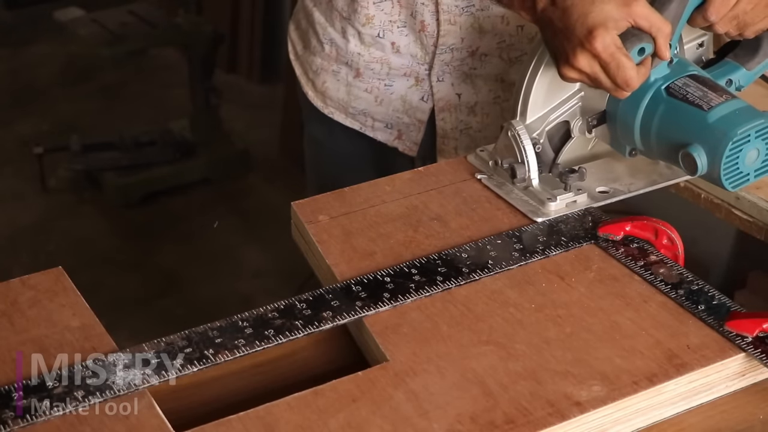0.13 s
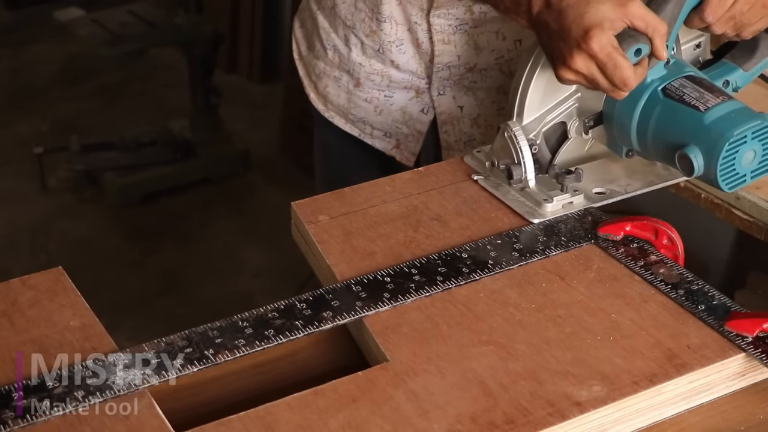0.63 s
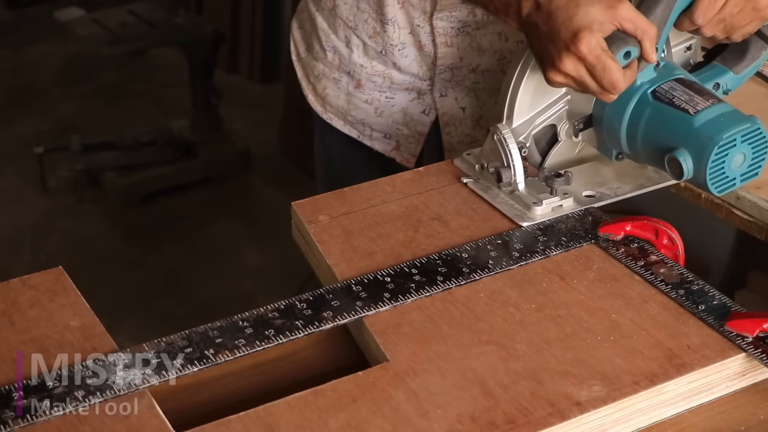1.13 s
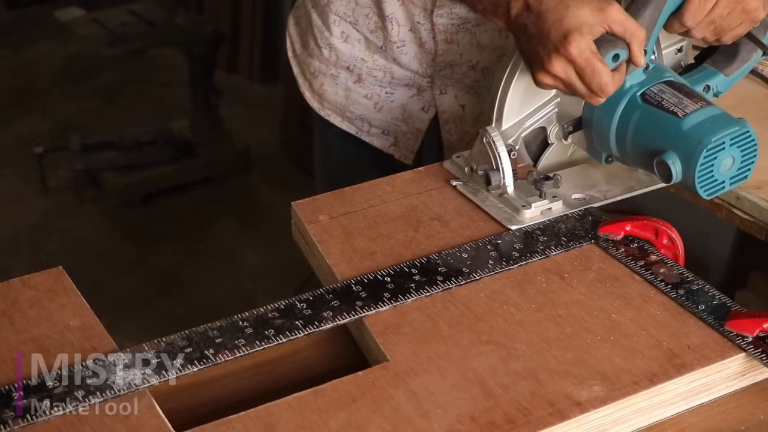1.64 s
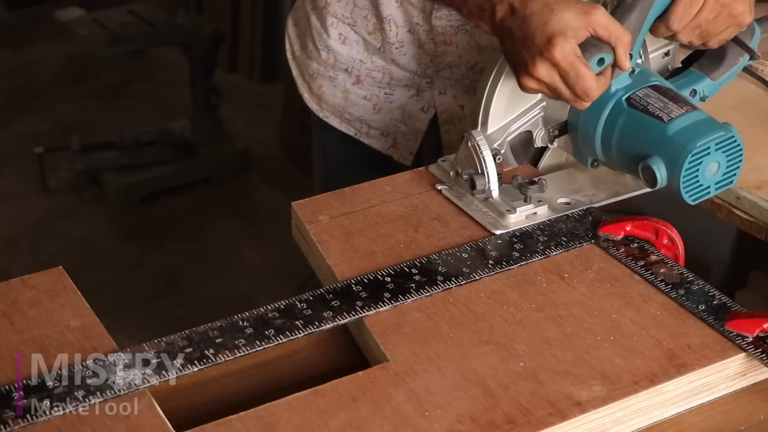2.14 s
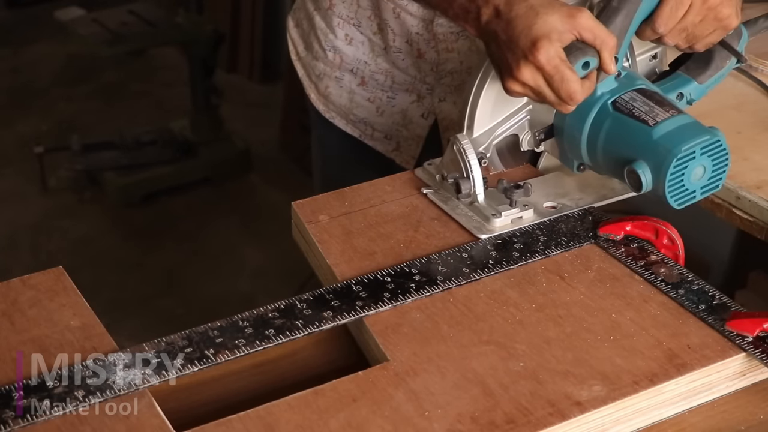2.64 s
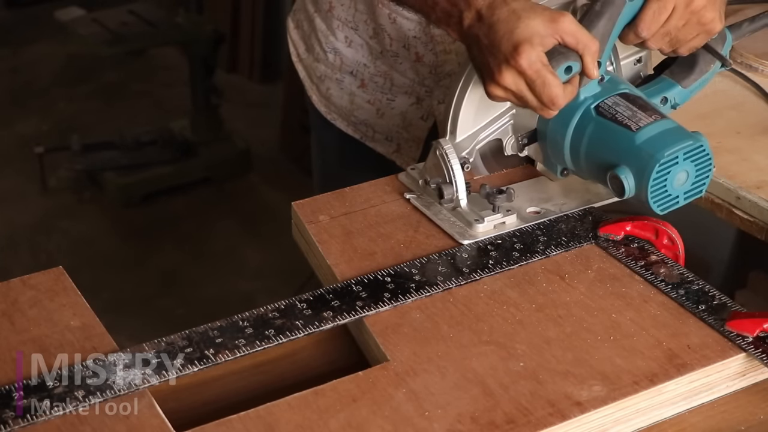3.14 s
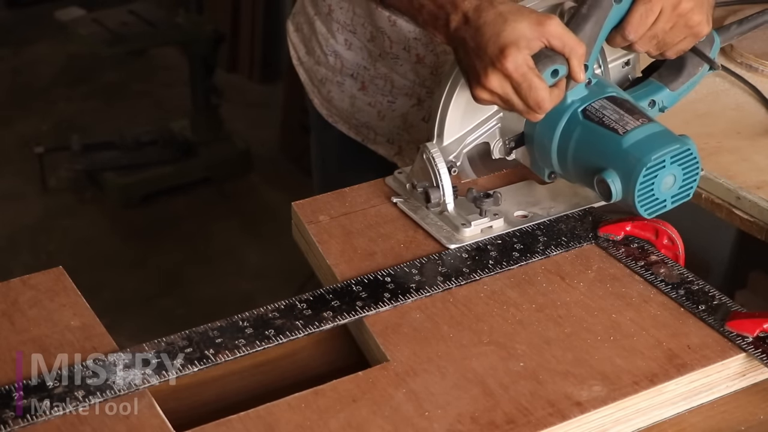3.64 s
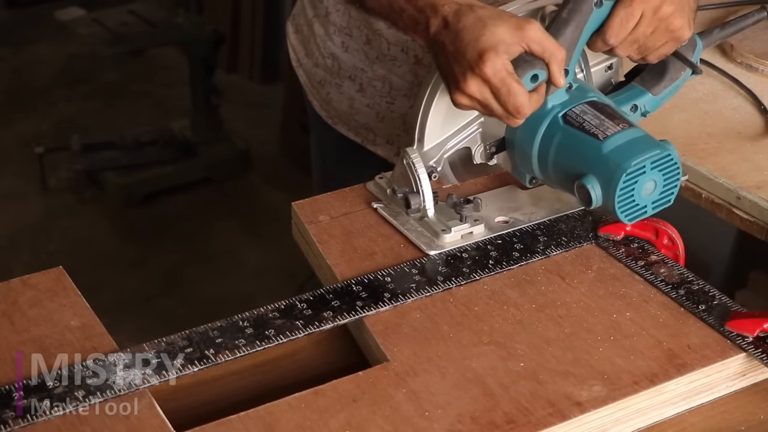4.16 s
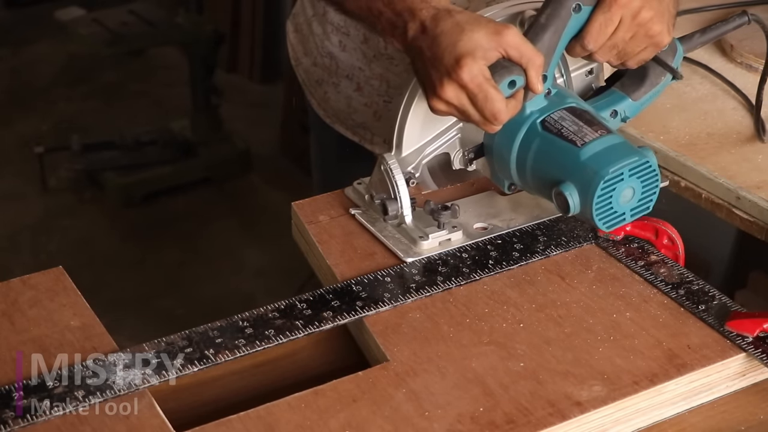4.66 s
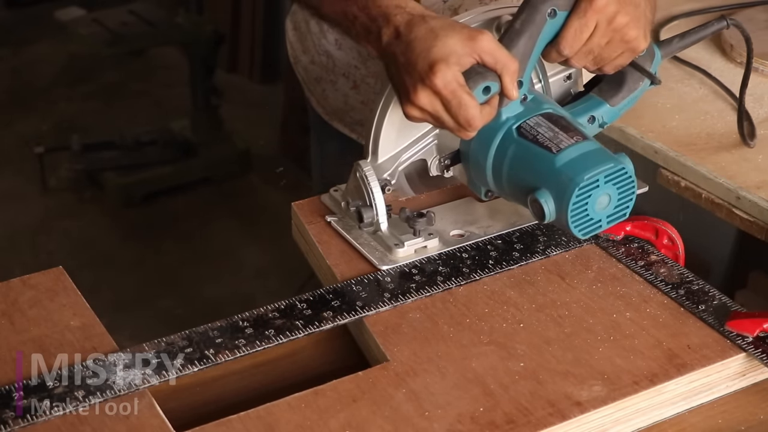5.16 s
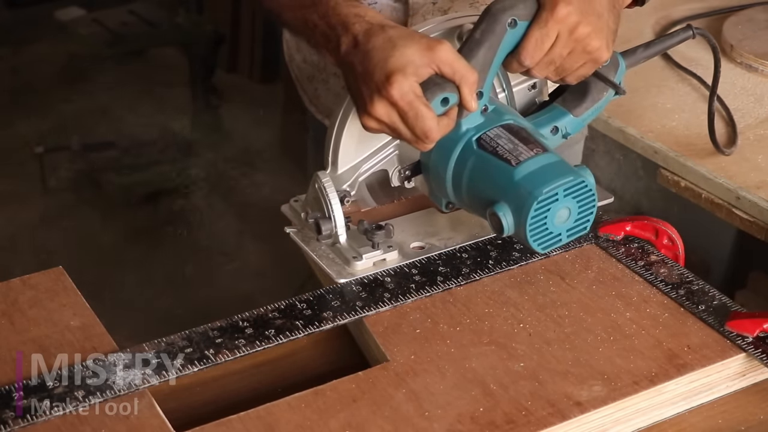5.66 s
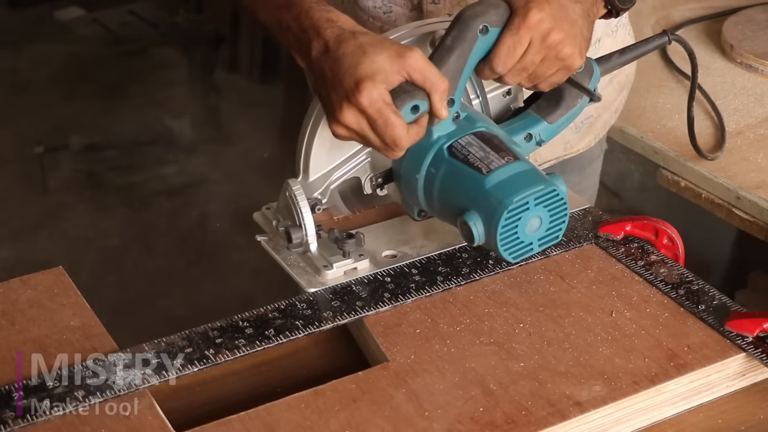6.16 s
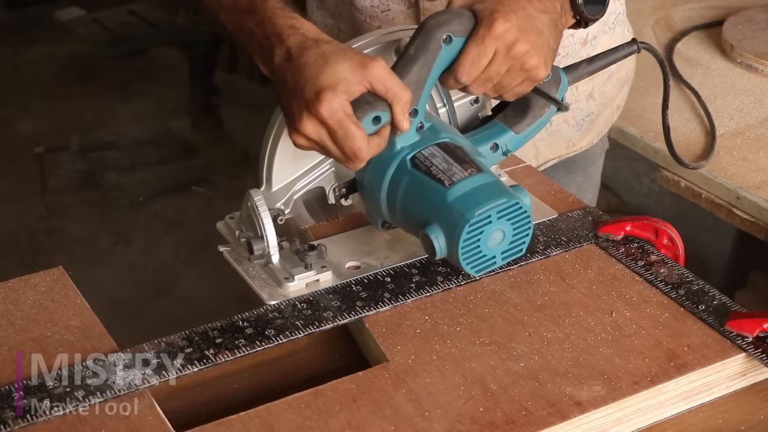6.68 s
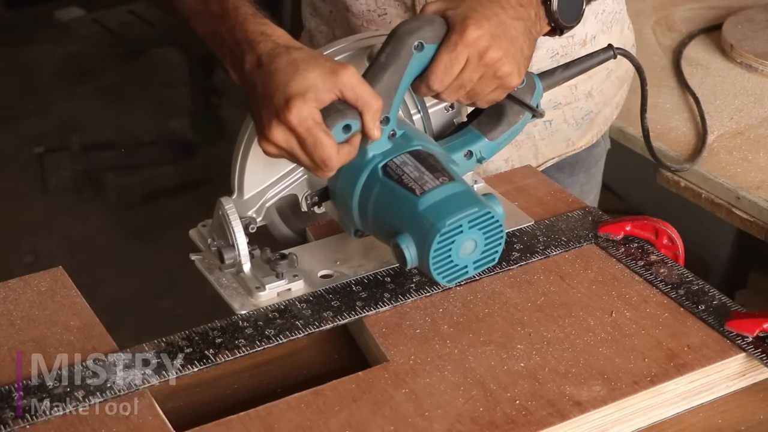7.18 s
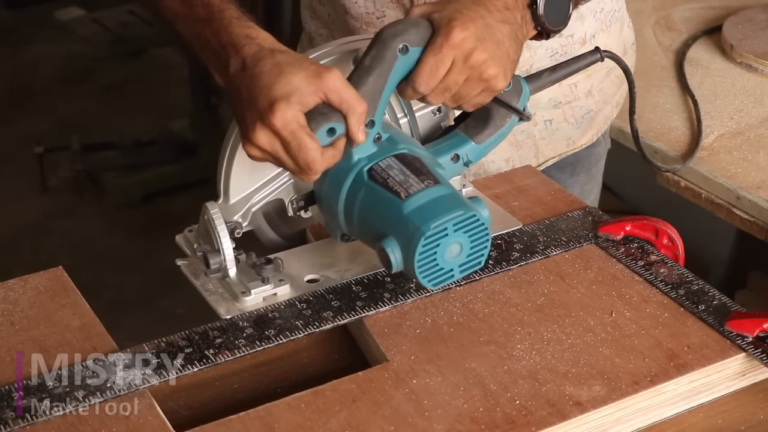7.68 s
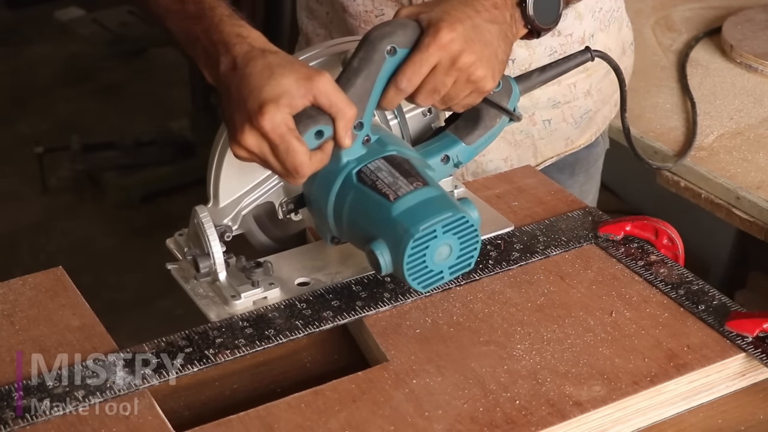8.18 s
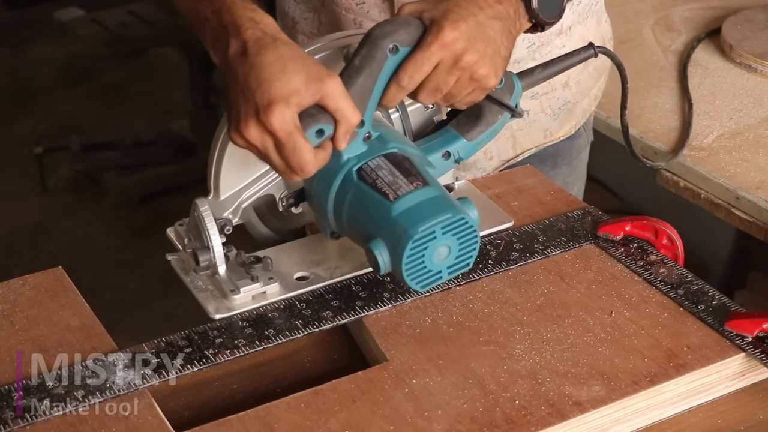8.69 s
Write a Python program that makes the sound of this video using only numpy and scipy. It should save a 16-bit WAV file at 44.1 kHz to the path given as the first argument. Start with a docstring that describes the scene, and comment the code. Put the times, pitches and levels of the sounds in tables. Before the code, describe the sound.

Close stereo microphone in a workshop: a power saw jumps to full speed with piercing motor whine and airy blade hiss, judders as it enters plywood, then cuts with a dense rasping roar, sagging in pitch under load. A rough screech flutters late in the cut. A crack and knocks mark the breakout, followed by freer spinning and a falling, ringing whine as power is released.

```python
"""Circular saw through plywood

In a workshop a hand-held saw spins up, cuts across a plywood sheet, breaks out at the far edge and coasts down.
Sines and narrow noise bands geared to the armature make its whine, shaft and tooth tones; shaped noise makes
the hiss of the blade and the rumble of sheet and guard; fluttering bands make the rubbing, decaying modes the
knocks. Another machine hums behind. Two close microphone ports hear it all, with the saw on the right."""
import sys
import numpy as np
from scipy import signal
from scipy.fft import rfft, irfft, next_fast_len
from scipy.io import wavfile
from scipy.ndimage import uniform_filter1d, map_coordinates

SR = 44100
rng = np.random.default_rng(int(sys.argv[2]) if len(sys.argv) > 2 else 0)


def generate_wav(signal):
    """Clip the signal to [-1, 1] and save it as 16-bit WAV at the path in sys.argv[1]."""
    frames = np.transpose(np.atleast_2d(signal))
    scaled = np.clip(frames, -1, 1) * 32767
    pcm = np.round(scaled).astype(np.int16)
    wavfile.write(sys.argv[1], SR, pcm)


def volts(x):
    """Linear amplitude factor 10**(x/20) for a level x in dB, scalar or array-like."""
    e = np.asarray(x, float) / 20
    return 10 ** e


N = 388521
TIME = np.arange(N) / SR  # s


def unit(x):
    """Scale to rms 1."""
    return x / np.sqrt(np.mean(x ** 2) + 1e-20)


def along(points, hz):
    """Read (Hz, value) points on a log frequency axis."""
    f, v = np.transpose(points)
    return np.interp(np.log(hz + 1), np.log(f + 1), v)


def curves(rows):
    """One value per sample for each column after the time."""
    s, *cols = np.transpose(rows)
    return [np.interp(TIME, s, c) for c in cols]


def wobble(rate):
    """A smooth random curve, rate knots a second."""
    return map_coordinates(rng.standard_normal(int(N * rate / SR) + 4), [TIME * rate])


def bump(s, length_s):
    """A smooth swell of height 1 around s."""
    return np.exp(-(2 * (TIME - s) / length_s) ** 2)


def filtered(x, response):
    """x times a response of frequency."""
    m = next_fast_len(N + 8192)
    return irfft(rfft(x, m) * response(np.fft.rfftfreq(m, 1 / SR)), m)[..., :N]


def phase(hz):
    """Running phase of a changing frequency."""
    return 2 * np.pi * np.cumsum(hz) / SR


def ports(alike):
    """Noise at the two microphone ports, its likeness following frequency."""
    turn = lambda hz: np.arccos(np.clip(alike(hz), -1, 1)) / 2
    weights = lambda hz: np.array([np.cos(turn(hz)), np.sin(turn(hz))])
    mid, side = filtered(rng.standard_normal((2, N)), weights)
    return np.array([mid + side, mid - side])


def band(hz, width_hz, alike):
    """Stereo narrow noise of rms 1 whose centre follows hz."""
    soft = lambda f: 1 / (1 + (2 * f / width_hz) ** 2)
    a, b = (filtered(ports(lambda f: alike + 0 * f), soft) for _ in "ab")
    return unit(a * np.cos(phase(hz)) + b * np.sin(phase(hz)))


def tones(turns, orders, waver_db, apart):
    """Sines on multiples of a phase; each wavers alone and reaches the two ports a little out of step."""
    out = 0
    for k, db in orders:
        level = np.sqrt(2) * volts(db + waver_db * wobble(7))
        offset = rng.uniform(0, 2 * np.pi) + apart * k * np.array([[1], [-1]])
        out = out + level * np.sin(k * turns + offset)
    return out


def lift(hz, modes):
    """Gain of resonances (Hz, width Hz, dB) standing on a flat response."""
    return np.sqrt(1 + sum(volts(2 * db) / (1 + (2 * (hz - c) / w) ** 2) for c, w, db in modes))


# Six stages: running free, cut begun, mid cut, late cut, out of the wood, coasting.
# Where one stage gives way to the next, in seconds.
STAGE_CHANGES = [1.7, 4.2, 5.35, 7.4, 8.43]
# How long each change takes, in seconds.
STAGE_CHANGE_LENGTHS = [0.27, 0.6, 0.076, 0.06, 0.45]


def stages(changes=STAGE_CHANGES):
    """The share of each stage over time, by linear crossfades."""
    passed = [np.clip((TIME - s) / w + .5, 0, 1) for s, w in zip(changes, STAGE_CHANGE_LENGTHS)]
    return -np.diff([np.ones(N), *passed, np.zeros(N)], axis=0)


# How loud the blade is, hand pushes aside. Each row: time in seconds, level in dB before small trims.
EFFORT = [(0, -23.5), (.25, -25), (.6, -26.5), (1.4, -29), (2.05, -33), (2.55, -34), (2.7, -35.5),
          (3.15, -35.5), (3.45, -33.5), (4.0, -33), (4.48, -37.5), (5.28, -34.5), (5.38, -38), (5.85, -36),
          (5.95, -38), (6.95, -37.5), (7.37, -37), (7.5, -31.5), (8.33, -32), (8.42, -31), (8.6, -30),
          (8.8, -33)]


def effort():
    """The blade's level in dB, to which the other parts are referred."""
    return curves(EFFORT)[0]


# The hand pushes the saw on or eases off; the brief swell at 7.74 s is a knock. Each row: middle in seconds,
# length in seconds, change in dB.
PUSHES = [(1.125, 0.14, 1), (1.823, 0.068, 1.5), (2.176, 0.057, 0.5), (2.443, 0.28, 1.5), (3.4, 0.067, 1.5),
          (3.772, 0.15, 1.5), (4.248, 0.055, 1.5), (4.69, 0.16, 2), (5.082, 0.18, 3), (5.938, 0.044, -2.5),
          (6.124, 0.13, 3), (6.464, 0.16, 0.5), (6.787, 0.11, 1.5), (6.935, 0.06, -2), (7.01, 0.097, 3),
          (7.123, 0.16, 4.5), (7.296, 0.14, 3), (7.544, 0.32, 2.5), (7.74, 0.027, 3.5), (7.887, 0.05, 3.5),
          (8.026, 0.17, 2.5), (8.186, 0.071, 3.5), (8.426, 0.18, 3)]


def pushes():
    """The hand's uneven pressure in dB, with one brief knock, as a sum of swells."""
    return sum(db * bump(s, length_s) for s, length_s, db in PUSHES)


FREE_HZ, START_GAP_HZ, SPIN_UP_S = 268, 54, .205  # unloaded turns per s, shortfall at start, time constant
OFF_S, COAST_S = 8.115, 1.09  # trigger released, time constant of the run-down
SLOW_HZ, SLOWEST_HZ = 233, 164  # coasting from one speed to the other the tones come forward
# The wood slows the armature. Each row: time in seconds, speed lost in turns per second.
LOAD = [(1.0, 0), (1.7, 4), (2.75, 20.5), (3.0, 22), (4.0, 20.5), (4.25, 23.5), (5.0, 25), (5.25, 30),
        (5.5, 42), (6.0, 37), (6.25, 42), (6.75, 39), (6.94, 33), (7.05, 22), (7.25, 15), (7.5, 7.5),
        (8.1, 4.5)]


def armature():
    """Wood load, turns per second and how far the coasting has gone (0 to 1); speed decays once power is off."""
    load, = curves(LOAD)
    driven = FREE_HZ - START_GAP_HZ * np.exp(-TIME / SPIN_UP_S) - load
    speed = driven * np.exp(-np.maximum(TIME - OFF_S, 0) / COAST_S)
    slowed = np.clip((SLOW_HZ - speed) / (SLOW_HZ - SLOWEST_HZ), 0, 1) * (TIME > OFF_S)
    return load, speed, slowed


CHOKE_HZ = 28  # loads over this, in turns per s lost, pack the gullets


def choke(load):
    """How far the load packs the gullets, in turns per second beyond the limit."""
    return np.maximum(load - CHOKE_HZ, 0)


WHINE_FOLLOWS, WHINE_DRIFT_DB, WHINE_RISE_DB = 0.94, 5, 19  # share of hand pushes, random fade, coasting rise
NO_ARC_DB = -2  # without current the brushes stop arcing
HOUSING_RING_HZ, HOUSING_RING_DB = 6200, -6  # the housing goes on ringing under the slow whine
# Whine against the blade in each of the six stages, in dB before trims.
WHINE_DB = [-8.5, -10, -10.5, -9.5, -20, -15]
# Clean commutator lines in the whine. Each row: order of the armature, relative level in dB.
COMMUTATOR_LINES = [(37, -19), (38, -15), (39, -14), (40, -18)]
# The motor housing rings as the whine sweeps past. Each row: centre in Hz, width in Hz, lift in dB.
HOUSING_MODES = [(6230, 200, 5)]


def commutator_whine(turns, speed, slowed):
    """Brush arcing smears most of the whine into bands geared to the armature, with clean lines inside."""
    level_db = effort() + WHINE_DB @ stages() + NO_ARC_DB * np.clip((TIME - OFF_S) / .05, 0, 1)
    level_db = level_db + WHINE_RISE_DB * slowed + WHINE_FOLLOWS * pushes() + WHINE_DRIFT_DB * wobble(5)
    # two upper bands come into range as the motor slows
    upper = band(77 * speed, 700, alike=.3) + volts(-3) * band(89 * speed, 700, alike=.3)
    upper = volts(np.interp(speed, [140, 158, 178], [-3, -11, -32])) * upper
    whine = band(38.2 * speed, 580, alike=.35) + upper + tones(turns, COMMUTATOR_LINES, 5, .015)
    ringing = volts(HOUSING_RING_DB) * band(HOUSING_RING_HZ + 0 * speed, 260, alike=.35)
    whine = volts(-1.5 * slowed) * whine + slowed ** 2 * ringing
    whine = volts(level_db + 2.5 + 1.3 * wobble(25)) * whine
    return filtered(whine, lambda hz: lift(hz, HOUSING_MODES))


SHAFT_FREE_S = 6.8  # the shaft tones fade once the sheet hangs loose
ENTRY_S, ENTRY_LENGTH_S, JUDDER_DB = 1.8, .55, 8  # upper shaft tones swell as the blade enters the wood
SHAFT_CHOKE_DB, SHAFT_RISE_DB = -.7, 3.5  # loss per turn per s of choking, rise on coasting
# Lower shaft tones. Each row: order of the armature, relative level in dB.
SHAFT_LOW = [(1, -5), (3, -1)]
# Upper shaft tones. Each row: order of the armature, relative level in dB.
SHAFT_HIGH = [(4, -6), (5, -1), (6, -9), (7, -10)]
# Lower shaft tones against the blade in each of the six stages, in dB before a trim.
SHAFT_LOW_DB = [-58, -48, -42, -34, -48, -50]
# Upper shaft tones against the blade in each of the six stages, in dB before a trim.
SHAFT_HIGH_DB = [-52, -33, -28, -28, -40, -46]


def shaft_tones(turns, load, slowed):
    """Whole orders of the armature as sines, the upper ones weakened by packed gullets."""
    shares = stages([*STAGE_CHANGES[:3], SHAFT_FREE_S, STAGE_CHANGES[4]])
    low_db = effort() + SHAFT_LOW_DB @ shares
    high_db = effort() + SHAFT_HIGH_DB @ shares + JUDDER_DB * bump(ENTRY_S, ENTRY_LENGTH_S)
    high_db = high_db + SHAFT_CHOKE_DB * choke(load) + SHAFT_RISE_DB * slowed
    low = volts(low_db + 1.5) * tones(turns, SHAFT_LOW, 2, .02)
    high = volts(high_db + 1.5) * tones(turns, SHAFT_HIGH, 3.5, .02)
    return low + high


TEETH_PER_TURN = 5.425  # tooth passages per turn of the armature
TOOTH_CHOKE_DB = -1.4  # loss per turn per s of choking
# Harmonics of the tooth tone. Each row: multiple, level in dB relative to the fundamental.
TOOTH_HARMONICS = [(2, -5), (3, -11), (4, -10), (5, -9), (6, -9)]
# The tooth tone against the blade. Each row: time in seconds, level in dB before a trim.
TOOTH_DB = [(0, -40), (.25, -32), (.5, -33), (.65, -42), (3.2, -40), (3.4, -54), (4.05, -54), (4.2, -37),
            (5.15, -36), (5.3, -38), (6.95, -38), (7.05, -31), (7.4, -34), (8.1, -38), (8.14, -29),
            (8.21, -23), (8.275, -44), (8.33, -23), (8.46, -19), (8.5, -32), (8.57, -16), (8.62, -36),
            (8.72, -19), (8.8, -26)]


def tooth_tones(turns, load):
    """The teeth sing at their passing rate and its multiples, weaker when the gullets pack."""
    level_db = effort() + curves(TOOTH_DB)[0] + TOOTH_CHOKE_DB * choke(load)
    passing = TEETH_PER_TURN * turns
    return volts(level_db + 3.5) * (tones(passing, [(1, 0)], 2, .2) + tones(passing, TOOTH_HARMONICS, 5, .2))


# The guard rings when a shaft or tooth tone passes. Each row: centre in Hz, width in Hz, lift in dB.
GUARD_MODES = [(1356, 135, 10)]


def motor():
    """Shaft orders, tooth tones and commutator whine, all geared to one slightly unsteady armature."""
    load, speed, slowed = armature()
    turns = phase(speed * (1 + .0004 * wobble(20)))
    geared = shaft_tones(turns, load, slowed) + tooth_tones(turns, load)
    return filtered(geared, lambda hz: lift(hz, GUARD_MODES)) + commutator_whine(turns, speed, slowed)


# Likeness of the roar at the two microphone ports. Each row: frequency in Hz, correlation.
ROAR_LIKENESS = [(60, 0.7), (300, 0.96), (1000, 0.98), (2500, 0.86), (8000, 0.39)]


def flickering_noise():
    """Stereo noise whose level flickers at random in patches of time and frequency."""
    z = signal.stft(ports(lambda hz: along(ROAR_LIKENESS, hz)), nperseg=512)[2]
    field = uniform_filter1d(uniform_filter1d(rng.standard_normal(z.shape[1:]), 8, 0), 10, 1)
    return signal.istft(z * volts(1.9 * unit(field)), nperseg=512)[1][:, :N]


SHEET_FOLLOWS = 1.6  # the sheet answers a push more than the blade
SHEET_LOOSE_S = 6.98  # the nearly severed sheet takes its free voice before the blade does
SHAKE_DB, SHAKE_S = 9, 0.16  # the sheet shakes after the first full knock: rise, decay time constant
# Rumble of the sheet against the blade in each of the six stages, in dB before trims.
SHEET_DB = [-17.5, -20.5, -19, -18, -14.5, -8]
# The rumble swells and drops as the sheet flexes on the bench.
# Each row: middle in seconds, length in seconds, change in dB.
FLEXES = [(0, .2, 1.5), (1.664, 0.062, 7), (3.09, 0.24, 1), (1.893, 0.32, 4.5), (5.39, 0.066, -3.5),
          (5.932, 0.081, -3), (6.23, 0.096, -1.5), (6.44, 0.25, 5), (6.6, .08, 4.5), (6.745, 0.086, 6.5),
          (6.913, 0.08, -0.5), (7.33, 0.062, -7), (7.597, 0.16, -1), (7.95, 0.19, -2)]


def sheet_level(hiss_db, push_db, loose):
    """Level of the sheet in dB: it follows the hand strongly, flexes and shakes."""
    since = TIME - KNOCKS[1][0]
    shake_db = SHAKE_DB * np.exp(-np.abs(since) / SHAKE_S) * np.clip(since / 0.0072, 0, 1)
    flex_db = sum(db * bump(s, length_s) for s, length_s, db in FLEXES)
    return hiss_db + (SHEET_FOLLOWS - 1) * push_db + SHEET_DB @ loose + shake_db + flex_db


# Colour of the roar, one table a stage. Each row: frequency in Hz, relative level in dB.
FREE_COLOUR = [(88, -72), (150, -46), (382, -34.5), (919, -29), (1750, -6), (2080, -13.5), (8150, -3.5),
               (9900, -3), (13000, -2.5), (15800, -10.5)]
# Cut begun. Each row: frequency in Hz, relative level in dB.
BEGUN_COLOUR = [(88, -68), (150, -51), (390, -22.5), (647, -25.5), (1500, -5.5), (2120, -10), (2960, -8.5),
                (9520, -0.5), (15800, -10)]
# Mid cut. Each row: frequency in Hz, relative level in dB.
MID_COLOUR = [(88, -61), (150, -38), (901, -15.5), (1300, -10), (2210, -8), (4040, -4.5), (5310, -7),
              (11300, -2.5), (15800, -13)]
# Late cut. Each row: frequency in Hz, relative level in dB.
LATE_COLOUR = [(88, -62), (150, -37.5), (634, -24.5), (1090, -15.5), (3200, -7), (4040, -3.5), (5000, -5.5),
               (10900, -2.5), (15800, -11)]
# Out of the wood. Each row: frequency in Hz, relative level in dB.
OUT_COLOUR = [(88, -57), (150, -38), (955, -23), (1890, -3), (2250, -8), (2630, -2), (5000, -2.5),
              (11300, 1.5), (15800, -2)]
# Coasting. Each row: frequency in Hz, relative level in dB.
COAST_COLOUR = [(88, -68), (150, -32), (300, -25.5), (420, -16.5), (1000, -17), (1850, -9), (4370, -11),
                (6320, -2), (9900, -14), (13300, -14), (15800, -26)]
# Modes of the steel blade, plus one broad band near 8880 Hz where the whine gathers under load. Each row:
# centre in Hz, width in Hz.
BLADE_MODES = [(1945, 30), (2700, 70), (2869, 14), (4000, 600), (4650, 150), (5630, 50), (6450, 150),
               (7430, 50), (8880, 250), (9920, 90), (10870, 220), (11170, 70), (11650, 110), (12850, 60),
               (13130, 70), (14100, 110), (15050, 90), (15500, 130)]
# Their strength changes as the wood grips the plate. One row a mode: dB over the roar in the six stages.
GRIP_DB = [(5, 6, 2, 4, -12, 5.5), (4.5, 7, 6, 4.5, 5.5, 5), (12.5, 9, 1, -3, 11, -2),
           (6, 0.5, 4.5, -3, -8, -4), (2.5, -4, 2.5, -1, 1, 2), (-14, -3, 12, 10.5, -2, -6),
           (2, 2.5, 2, 0, -6, 1), (9.5, 11, 9.5, 11.5, -3, -4), (-3, 1.5, 6, 3, -2, -9),
           (0, 9.5, -3, -1, 5.5, -9), (-8, -1, 4, 12, -3, -9), (-1, 12, 3, 1, 0, -8),
           (7.5, 5, 11, 8, 4.5, -9), (0, 10, 2, 9, -3, 10), (7, 2, 1, 8, -2, 0), (-9, -3, 2, 10, -4, -9),
           (0, 8, 12, 11, -4, -9), (-4, 1, 9, 13, -10, -9)]
# Low resonances of sheet, bench and room. Each row: centre in Hz, width in Hz, dB over the roar.
SHEET_MODES = [(221, 5.2, 15), (304, 20, 10.5), (397, 12, 11), (814, 3.5, 14.5), (1045, 11, 9.5),
               (1093, 10.5, 10), (1550, 23, 2.5)]


def roar():
    """Air, chips and rubbing excite blade and sheet; the colour passes from stage to stage."""
    shares = stages()
    loose = stages([*STAGE_CHANGES[:3], SHEET_LOOSE_S, STAGE_CHANGES[4]])
    push_db = pushes()
    hiss_db = effort() + push_db
    sheet_db = sheet_level(hiss_db, push_db, loose)
    noise = flickering_noise()
    high = lambda hz: 1 / (1 + (2300 / (hz + 1)) ** 8)  # blade above, sheet below
    split = lambda hz: np.array([high(hz), 1 - high(hz)])[:, None]
    colours = [FREE_COLOUR, BEGUN_COLOUR, MID_COLOUR, LATE_COLOUR, OUT_COLOUR, COAST_COLOUR]
    hiss, sheet = 0, 0
    for k, colour in enumerate(colours):
        modes = SHEET_MODES + [(c, w, dbs[k]) for (c, w), dbs in zip(BLADE_MODES, GRIP_DB)]
        up, down = filtered(noise, lambda hz: volts(along(colour, hz)) * lift(hz, modes) * split(hz))
        hiss = hiss + shares[k] * unit(up)
        sheet = sheet + loose[k] * unit(down)
    feed = wobble(12)  # the hand feeds the saw unevenly
    hiss = volts(hiss_db + 0.5 + 0.34 * feed + 0.42 * wobble(40)) * hiss
    return hiss + volts(sheet_db + 0.3 + 0.58 * feed) * sheet


SCREECH_WANDER_HZ, SCREECH_WIDTH_HZ = 54.75, 630
# The plate screeches while the kerf grips it. Each row: time in seconds, relative level in dB, centre in Hz.
SCREECH = [(4.4, -54, 4104), (5.0, -42, 4024), (5.31, -37, 4060), (5.42, -45, 4057), (5.66, -39, 4264),
           (5.75, -44.5, 4124), (5.9, -40.5, 4300), (5.98, -46, 4300), (6.18, -38, 4026),
           (6.23, -46.5, 4066), (6.35, -49.5, 4170), (6.47, -43.5, 3950), (6.55, -44, 4030),
           (6.62, -42, 4063), (6.9, -42, 4143), (7.2, -53, 4250)]


def screech():
    """Stick-slip of the gripped plate against the wood: a wandering, fluttering band."""
    on = np.clip(np.minimum(TIME - SCREECH[0][0], SCREECH[-1][0] - TIME) / .2, 0, 1)
    level_db, hz = curves(SCREECH)
    level = on * volts(level_db + 2.3 * wobble(100))
    return level * band(hz + SCREECH_WANDER_HZ * wobble(5), SCREECH_WIDTH_HZ, alike=0.83)


RUB_ATTACK_S, RUB_FADE_DB, RUB_WIDTH_HZ = 0.012, -8.5, 380
# The plate rubs on leaving. Each row: start in seconds, length in seconds, first Hz, last Hz,
# starting level in dB.
RUBS = [(7.39, 0.037, 6800, 6660, -21), (7.44, .14, 6500, 6100, -34), (7.40, 0.11, 2550, 2700, -37.5),
        (7.5, 0.075, 2950, 3110, -30.5), (7.57, 0.2, 2950, 2660, -42)]


def exit_rubs():
    """Short stick-slip rubs: fluttering bands that glide in pitch and fade."""
    out = 0
    for s, length_s, from_hz, to_hz, db in RUBS:
        gone = np.clip((TIME - s) / length_s, 0, 1)
        on = np.clip(np.minimum(TIME - s, s + length_s - TIME) / RUB_ATTACK_S, 0, 1)
        level = on * volts(db + RUB_FADE_DB * gone + 1.9 * wobble(100))
        out = out + level * band(from_hz + (to_hz - from_hz) * gone, RUB_WIDTH_HZ, alike=0.52)
    return out


# Single modes of sheet and plate sing for a moment.
# Each row: middle in seconds, length in seconds, centre in Hz, width in Hz, relative level in dB.
SINGS = [(0, 0.32, 298, 37, -63), (1.868, 0.26, 800, 70, -56), (3.8, 1, 2990, 170, -47),
         (3.86, 0.53, 5710, 30, -43), (4.15, 0.33, 1097, 16, -51)]


def singing_modes():
    """Narrow noise bands of sheet and plate swell and fade."""
    return sum(volts(db) * bump(s, length_s) * band(hz + 0 * TIME, width_hz, alike=0.93)
               for s, length_s, hz, width_hz, db in SINGS)


def butter_noise(low_hz, high_hz, count):
    """Band-passed noise of rms 1."""
    sos = signal.butter(2, [low_hz, high_hz], "band", fs=SR, output="sos")
    return unit(signal.sosfilt(sos, rng.standard_normal(count)))


THUD_DB, THUD_S = -16, 1.1  # the bench under the ringing, and its t60
CRACK_DB, CRACK_S = 14, .08  # splintering fibres over the ringing, and their t60
# The offcut breaks free and bumps. Each row: start in seconds, level in dB before a trim.
KNOCKS = [(7.356, -42), (7.373, -27), (7.384, -24.5)]
# Modes of the offcut. Each row: frequency in Hz, relative level in dB, t60 in seconds.
OFFCUT_MODES = [(800, -1.5, 0.07), (890, -4, 0.06), (1384, 6, 0.086), (1540, -7, .054), (1760, 2, 0.07),
                (1940, 10, 0.031), (2510, 12, 0.056), (3140, 8, 0.037)]


def breakout():
    """The offcut knocks as it breaks away: decaying modes, a crack of fibres and a thud of the bench."""
    out, t = np.zeros(N + SR), np.arange(SR // 2) / SR
    for s, db in KNOCKS:
        knock = 0
        for hz, level, t60 in OFFCUT_MODES:
            decay = volts(level + rng.normal(0, 3) - 60 * t / t60)
            knock = knock + decay * np.sin(2 * np.pi * hz * t + rng.uniform(0, 2 * np.pi))
        knock = knock + volts(CRACK_DB - 60 * t / CRACK_S) * butter_noise(750, 3500, len(t))
        thud = volts(THUD_DB - 60 * t / THUD_S) * butter_noise(260, 750, len(t))
        knock = knock + thud * (1 - np.exp(-t / .015))
        out[round(s * SR):][:len(t)] += volts(db - 12.5) * knock * (1 - np.exp(-t / 0.003)) ** 2
    return out[:N]


# Decay of the echoes. Each row: frequency in Hz, t60 in seconds.
WALL_DECAY = [(500, 0.31), (4000, 0.25), (14000, 0.1)]


def walls(x, count):
    """Echoes of bench and walls comb the sound finely; the pattern changes as the saw moves on."""
    out, step = np.zeros((2, N + SR)), N // count + 1
    for k in range(count + 1):
        hz, t, z = signal.stft(rng.standard_normal((2, SR // 2)), SR, nperseg=256)
        tail = signal.istft(z * volts(-60 * t / along(WALL_DECAY, hz)[:, None]), SR, nperseg=256)[1]
        a, b = max((k - 1) * step, 0), min((k + 1) * step, N)
        piece = x[:, a:b] * np.cos(np.pi / 2 * (np.arange(a, b) / step - k))  # crossfaded pieces
        wet = signal.fftconvolve(piece, tail / np.linalg.norm(tail[0]), axes=1)
        out[:, a:a + wet.shape[1]] += wet
    # the ports are close: long waves reach both alike
    mid = filtered((out[0] + out[1])[:N] / 2, lambda hz: 1 / (1 + (900 / (hz + 1)) ** 4))
    side = filtered((out[0] - out[1])[:N] / 2, lambda hz: 1 / (1 + (1900 / (hz + 1)) ** 4))
    return np.array([mid + side, mid - side])


# Lean of the saw to the right port. Each row: frequency in Hz, left minus right in dB.
LEAN = [(60, -1), (240, -3.7), (950, -3), (3770, -4.3), (15000, -5.2)]
# Movement as the saw travels. Each row: time in seconds, left minus right in dB; only departures
# from the mean are played.
TRAVEL = [(0, -2.9), (2, -2.6), (4.8, -3), (5.1, -1.6), (8.2, -1.8), (8.8, -2.8)]


def placed(saw):
    """Level differences between the ports put the saw on the right, more so in the treble."""
    side = np.array([[.5], [-.5]])
    pan_db, = curves(TRAVEL)
    return filtered(saw, lambda hz: volts(side * along(LEAN, hz))) * volts(side * (pan_db - pan_db.mean()))


# The other machine in the workshop. Each row: frequency in Hz, level in dB rms about which it wavers.
HUM = [(192, -86), (384, -80), (576, -79)]
# Colour of the distant rumble. Each row: frequency in Hz, relative level in dB.
RUMBLE_COLOUR = [(15, -42), (25, -6), (75, -4.5), (107, 7), (150, -11), (190, -14), (260, 5), (440, -120)]
# The rumble swells at the end. Each row: time in seconds, level in dB.
RUMBLE_DB = [(0, -79), (7.3, -86), (8.2, -77), (8.8, -67)]


def workshop():
    """Wavering sines for another machine's hum over a low rumble of shaped noise."""
    rumble = unit(filtered(ports(lambda hz: .9 + 0 * hz), lambda hz: volts(along(RUMBLE_COLOUR, hz))))
    hum = sum(np.sqrt(2) * volts(db + 3 * wobble(5)) * np.sin(2 * np.pi * hz * TIME) for hz, db in HUM)
    return hum + volts(curves(RUMBLE_DB)[0]) * rumble


def scene():
    """The saw, direct and by way of the walls, in front of the workshop."""
    drive = motor()
    cut = roar() + screech() + exit_rubs() + singing_modes() + breakout()
    # the motor faces the ports, so less of it arrives by way of the walls
    saw = volts(-2.5) * (drive + cut) + volts(-3) * walls(cut + .5 * drive, count=10)
    return placed(saw) + workshop()


def low_pass(x):
    """A steep low-pass at 16040 Hz that trims the very top of the treble."""
    return signal.sosfilt(signal.butter(12, 16040, fs=SR, output="sos"), x)


def record(dry):
    """The camera keeps nothing above its band limit of 15770 Hz."""
    mix = filtered(dry, lambda hz: hz < 15770)
    return low_pass(mix)


dry = scene()
out = record(dry)
generate_wav(out)
```